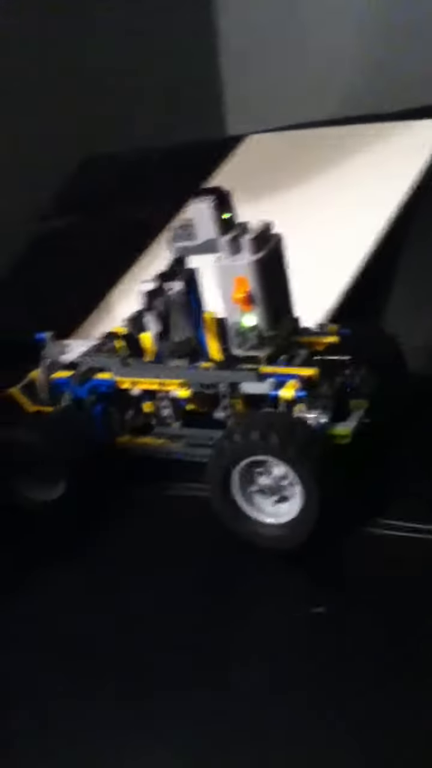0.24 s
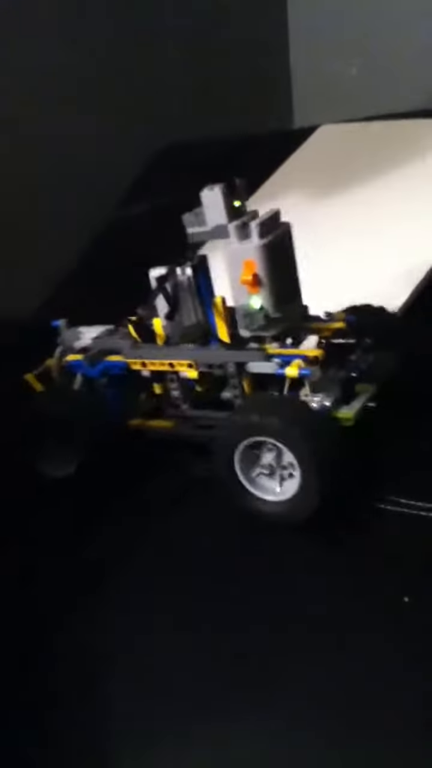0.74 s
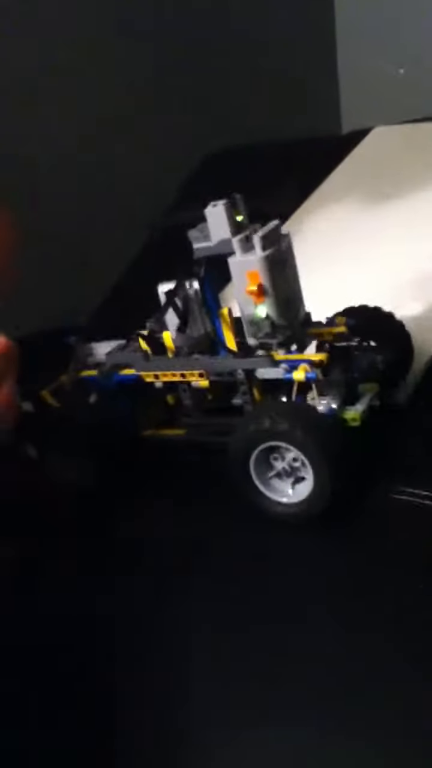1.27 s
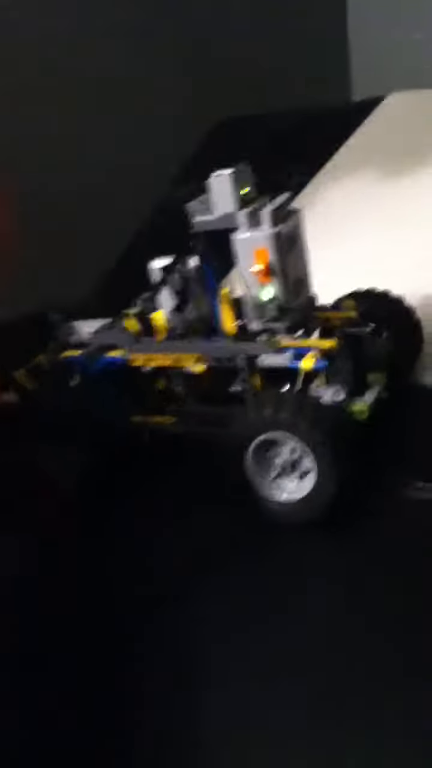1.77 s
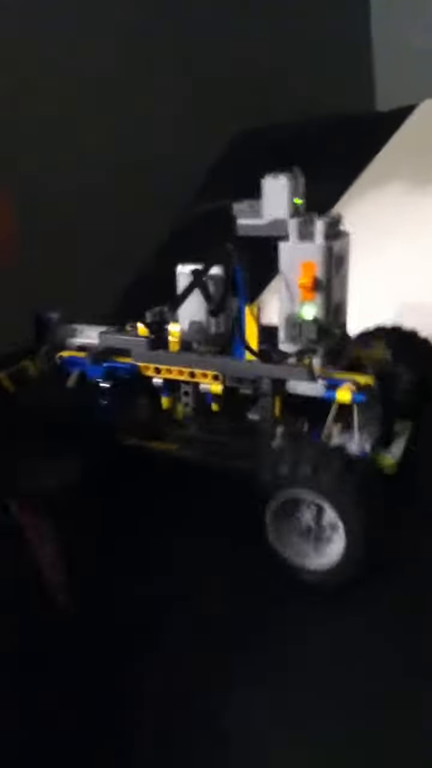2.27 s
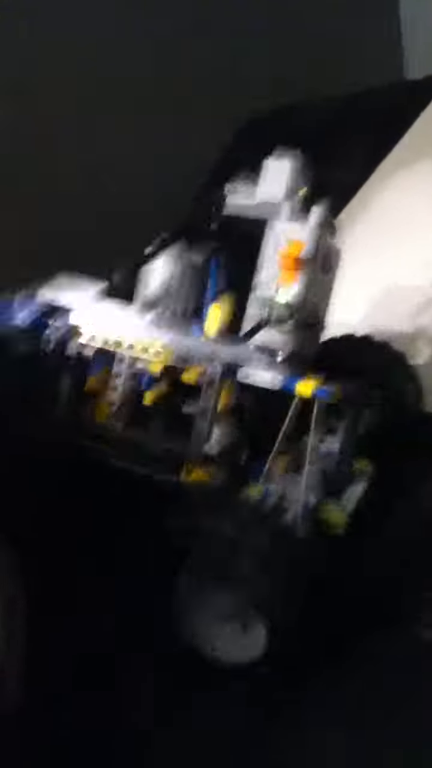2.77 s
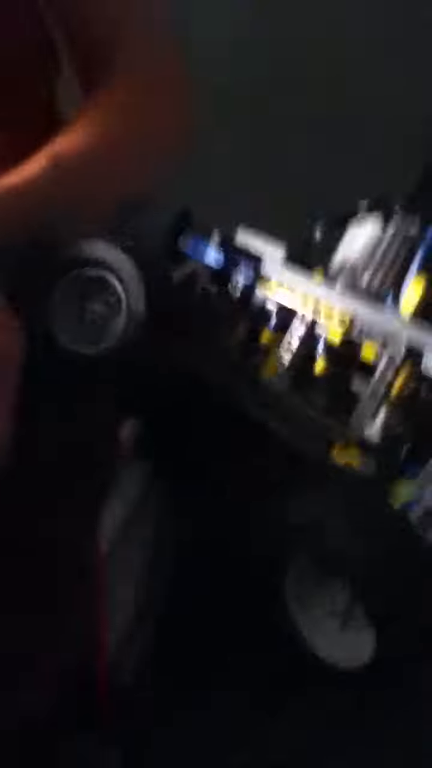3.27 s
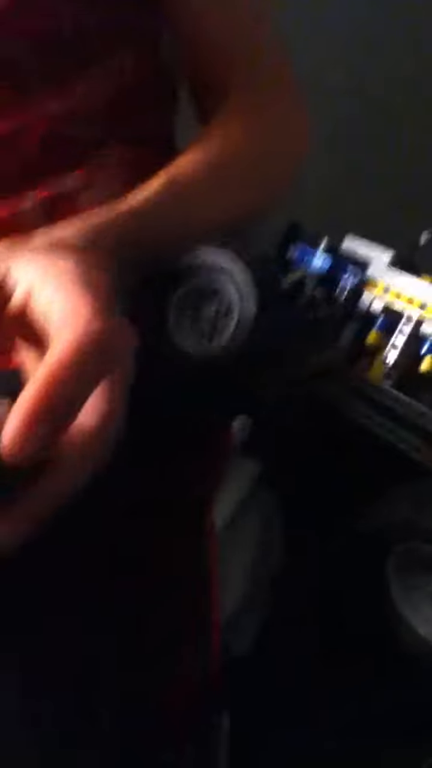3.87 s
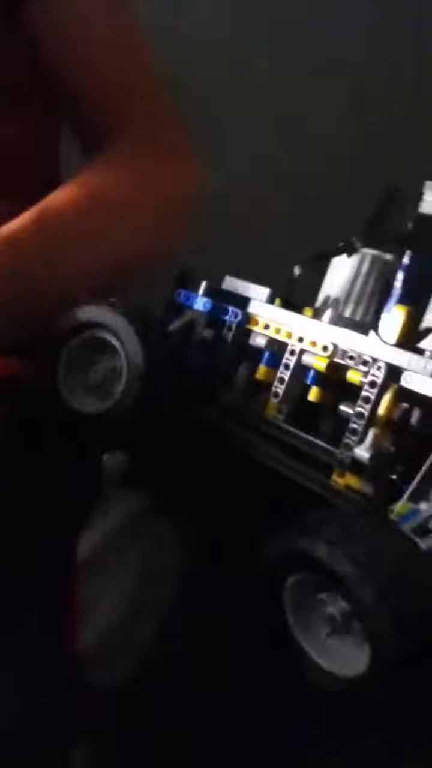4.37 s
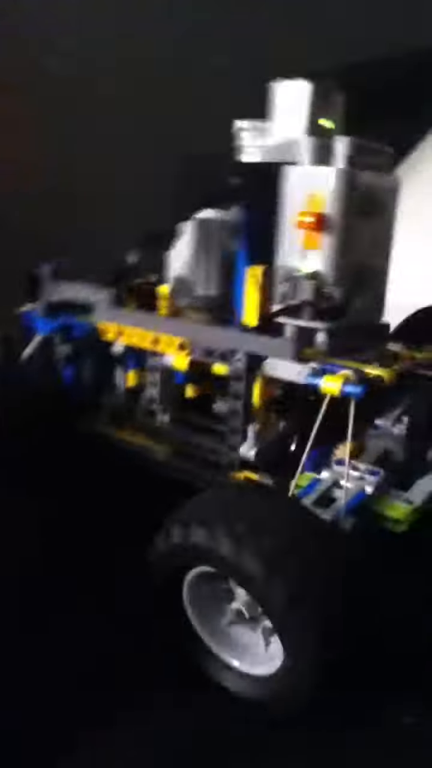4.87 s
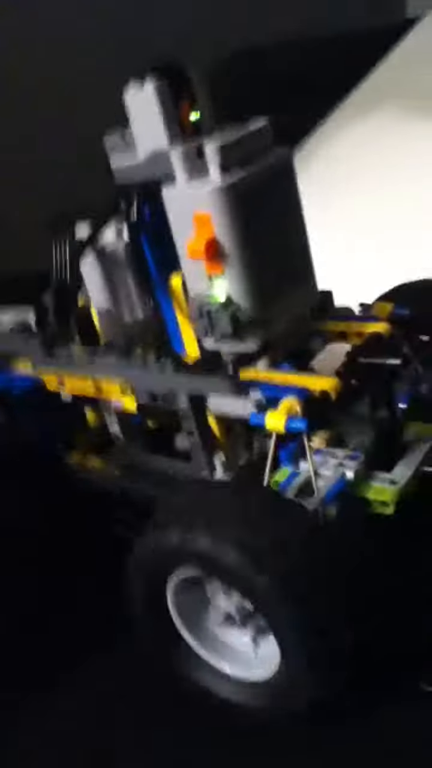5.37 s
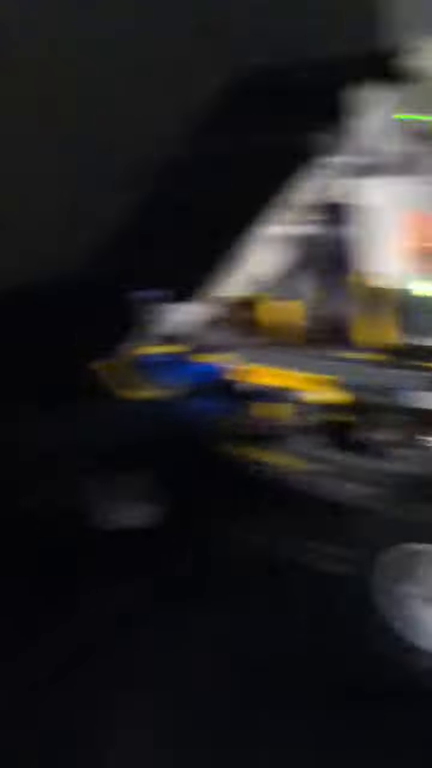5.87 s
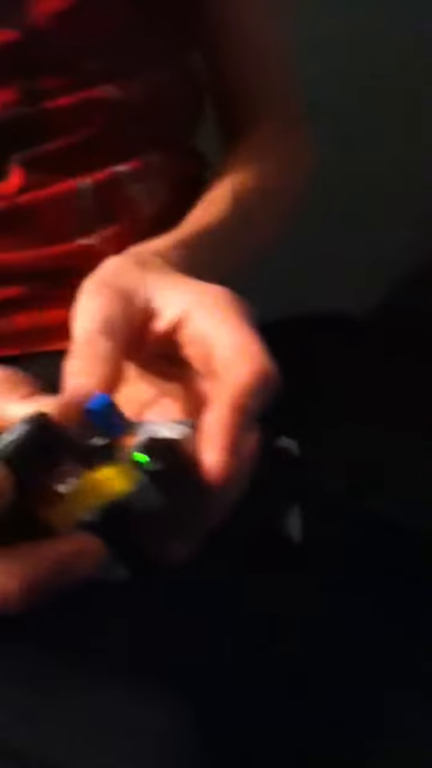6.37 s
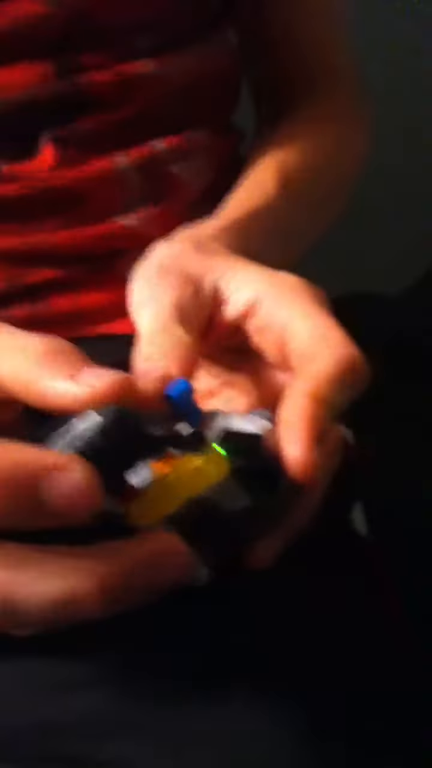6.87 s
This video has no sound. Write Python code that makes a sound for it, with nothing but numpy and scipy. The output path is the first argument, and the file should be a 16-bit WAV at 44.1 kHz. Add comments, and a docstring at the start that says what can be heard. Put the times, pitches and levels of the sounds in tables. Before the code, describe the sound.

A small electric motor whines and plastic gears grind in bursts as a brick-built toy truck starts, stops and coasts in a quiet room.

```python
"""In a quiet room a toy truck of plastic bricks is driven to and fro by a small geared motor.
The gear teeth whine at the rate they meet and grind noisily: wavering partials, and hiss with ticks.
Both ring through the panels of the housing, which face the microphone in turn as the truck is moved about.
Now and then a part snaps (a burst of contacts rings the bricks) or a wheel bumps (a click rings a low mode).
Behind this lie a short low rumble, the room's echo of the knocks, steady noise and a faint mains hum."""
import sys
import numpy as np
from scipy import signal
from scipy.fft import rfft, irfft
from scipy.io import wavfile
from scipy.ndimage import map_coordinates

SR = 44100
rng = np.random.default_rng(int(sys.argv[2]) if len(sys.argv) > 2 else 0)


def output_pcm(signal):
    """Save a mono or channel-first signal as 16-bit PCM at the path in sys.argv[1].

    Samples are clipped to [-1, 1] before scaling.
    """
    pcm = np.clip(np.atleast_2d(signal).T, -1, 1) * 32767
    wavfile.write(sys.argv[1], SR, np.round(pcm).astype(np.int16))


N = 313992  # length in samples


def from_db(db):
    """Turn decibels into a gain."""
    return 10 ** (np.asarray(db) / 20)


def rms_one(x):
    """Scale a sound to an rms (average strength) of 1."""
    return x / np.sqrt(np.mean(x ** 2) + 1e-20)


def in_time(rows):
    """Join the rows of a table into curves, one for each column after the time."""
    seconds, *columns = np.transpose(rows)
    return [np.interp(np.arange(N) / SR, seconds, column) for column in columns]


def colour(points):
    """Gain at each FFT frequency, joined up from points of Hz and dB."""
    hz, db = np.transpose(points)
    bins_hz = np.fft.rfftfreq(N, 1 / SR)
    return from_db(np.interp(np.log(bins_hz + 1), np.log(hz), db))


def drift(rate_hz):
    """A random wandering curve of rms 1: noise smoothed twice above rate_hz."""
    # made at a sixteenth of the sample rate; the first 4000 values let the filter settle
    r = np.exp(-32 * np.pi * rate_hz / SR)
    noise = rng.standard_normal(N // 16 + 4002)
    slow = signal.lfilter([1], [1, -2 * r, r * r], noise)[4000:]
    return np.interp(np.arange(N) / 16, np.arange(len(slow)), rms_one(slow))


def ring(clicks, hz, t60):
    """A struck mode: each unit click starts a sine of height 1 that falls 60 dB in t60 seconds."""
    r = from_db(-60 / (t60 * SR))
    w = 2 * np.pi * hz / SR
    return signal.lfilter([0, np.sin(w)], [1, -2 * r * np.cos(w), r * r], clicks + 1e-18)


# How fast the teeth of the fastest gear pair meet, as the load changes.
# Each row: time in seconds, tooth rate in Hz.
TOOTH_RATE = [(0, 1032), (.5, 1135), (.75, 1110), (.92, 923), (1.1, 951), (1.3, 1141), (1.37, 1107),
              (1.55, 940), (1.7, 880), (1.88, 624), (2.05, 762), (2.3, 812.5), (2.55, 845), (2.75, 968),
              (2.85, 991), (2.93, 950), (3.0, 935), (3.1, 910), (3.47, 713), (3.63, 819), (3.75, 949),
              (4.08, 958), (4.2, 1065), (4.3, 1080), (4.4, 1137), (4.55, 1055), (4.72, 997), (4.9, 992),
              (5.1, 1123), (5.22, 1159), (5.35, 1034), (5.8, 1025), (5.94, 1085), (6.18, 1023), (6.4, 1105),
              (6.58, 1098), (6.72, 993), (6.84, 1000), (6.88, 955), (6.94, 1130), (6.98, 1160),
              (7.04, 1080), (7.12, 1090)]
# The truck as the microphone sees it.
# Each row: time in seconds, heading in degrees, level in dB, extra level of the top panel in dB.
POSE = [(0, -77, -34.5, -9), (.3, -56, -34.5, -14), (.38, -86, -35, 7.5), (1.0, -59, -33, -3.5),
        (1.3, -43, -35.5, 7), (1.6, 19, -33, 1), (1.95, -3, -35, -2), (2.33, 37, -34, -1),
        (2.6, 73, -34.5, 1.5), (2.9, 110, -34, 6.5), (3.55, 92, -34.5, 4), (3.85, 151, -34, 3),
        (4.0, 173, -34.5, -12), (4.3, 210, -35.5, -3.5), (4.45, 182, -35.5, 5), (4.8, 205, -34.5, 3.5),
        (5.1, 248, -33, 2), (5.6, 265, -32, 2.5), (6.15, 232, -32, 2), (6.3, 197, -37.5, -13),
        (6.66, 23, -37.5, -1), (6.8, 209, -34, -39), (6.9, 203, -36, -1), (6.96, 178, -36, 9),
        (7.12, 160, -38, 6)]


def motor(surge_db=-0.17):
    """Whine and grind share one throttle and reach us through the housing and its near echoes."""
    mesh_hz = in_time(TOOTH_RATE)[0]
    heading, level_db, top_db = in_time(POSE)
    teeth = knocking(mesh_hz) * (whine(mesh_hz) + grind(mesh_hz))
    gears = near_echoes(housing(teeth, heading, top_db))
    return throttle() * from_db(level_db + surge_db * drift(4.2)) * gears


# Each run of the motor.
# Each row: switch-on in seconds, seconds to engage, dB below full at the start, switch-off in seconds,
# seconds to coast 20 dB down, time in seconds at which the gears halt.
RUNS = [(-.5, 0.0066, 5, 0.64, 0.5, .88), (.925, .012, 18, .94, .04, .946),
        (0.964, 0.018, 11.5, 1.57, 0.17, 1.65), (1.89, 0.0037, 13, 3.027, 0.83, 3.114),
        (3.475, 0.041, 16, 3.7, 0.44, 3.9), (3.964, 0.004, 6, 6.67, 8, 6.7),
        (6.735, .01, 9, 7.3, 1.5, 7.495)]
SPIN_UP_S, COAST_POWER = 0.056, 1.21  # time for the missing dB to shrink to 37 %; bend of the coasting
HALT_DB_PER_S = 202  # extra fall after the halt


def throttle():
    """Each run engages, spins up to full, and coasts down ever faster once released."""
    t = np.arange(N) / SR
    out = 0
    for on, engage, start_db, off, coast, halt in RUNS:
        spin_up_db = -start_db * np.exp(-np.maximum(t - on, 0) / SPIN_UP_S)
        coast_db = -20 * (np.maximum(t - off, 0) / coast) ** COAST_POWER
        halt_db = -HALT_DB_PER_S * np.maximum(t - halt, 0)
        engaged = np.clip((t - on) / max(engage, .002), 0, 1)
        out = out + engaged * from_db(spin_up_db + coast_db + halt_db)
    return out


# Spells in which one partial of the whine sings out.
# Each row: start in seconds, end in seconds, multiple of the tooth rate, added level in dB.
SPELLS = [(-.2, .45, 1 / 3, 16), (4.1, 4.42, 1 / 3, 14), (6.9, 7.3, 1 / 3, 11), (4.55, 4.92, .6, 11),
          (5.28, 6.2, .6, 12), (4.03, 4.27, .55, 12), (4.95, 5.15, .5, 10), (4.14, 4.36, 2 / 3, 7),
          (4.76, 4.92, 1.2, 9), (4.64, 5.0, 1.8, 10), (.6, .73, 1, 8), (1.08, 1.23, 1, 12),
          (1.29, 1.57, 1, 10), (4.5, 4.9, 1, 8), (2.65, 3.06, 1, 12), (4.1, 4.26, 1, 14),
          (4.95, 5.27, 1, 11), (5.33, 6.18, 1, 10), (-.2, .3, 1, 5), (6.3, 6.66, 1, 7), (6.9, 7.2, 1, 3),
          (1.09, 1.21, 2, 5), (1.35, 1.62, 2, 8), (2.65, 3.02, 2, 7), (4.5, 6.2, 2, 4), (6.34, 6.68, 2, 7),
          (-.2, .18, 2, 5), (6.75, 6.9, 2, 7), (7.0, 7.2, 2, 6), (1.33, 1.58, 3, 7), (2.28, 2.74, 3, 11),
          (2.76, 3.1, 3, 11), (6.33, 6.5, 3, 5), (3.55, 3.8, 3, 11), (4.66, 4.95, 3, 13),
          (5.33, 5.88, 3, 8), (6.94, 7.01, 3, 6), (7.04, 7.2, 3, 4), (1.38, 1.62, 4, 9.5),
          (1.08, 1.16, 4, 6), (1.93, 2.12, 4, 5), (2.12, 2.78, 4, 9), (3.58, 3.78, 4, 7),
          (4.62, 4.95, 4, 11), (6.56, 6.73, 4, 11), (-.2, .7, 4, 4), (.3, .78, 5, 11), (1.93, 2.7, 5, 10),
          (2.74, 3.05, 5, 6), (1.95, 2.1, 6, 9), (2.3, 2.68, 6, 10), (2.85, 3.08, 6, 6), (2.0, 2.5, 7, 8),
          (1.05, 1.45, 5, 7), (2.78, 3.06, 4, 9), (2.1, 2.3, 2, 5)]
FADE_S = .08  # length of the fades of a spell, and of the knocking


def spell_db(multiple):
    """Extra dB for one partial, faded in and out around the ends of its spells."""
    t = np.arange(N) / SR
    db = 0
    for start, end, which, added_db in SPELLS:
        if which == multiple:
            db = db + added_db * np.clip(np.minimum(t - start, end - t) / FADE_S + .5, 0, 1)
    return db


# Partials of the tooth rate; the fractional ones come from slower gear stages.
# Each row: multiple of the tooth rate, base level in dB at the normal rate,
# dB gained each time the speed doubles, steady part of the force (the random parts have size 1).
PARTIALS = [(1 / 3, -45, 0, .55), (.5, -42, 0, 1.5), (.55, -42, 0, 1.5), (.6, -42, 0, 2),
            (2 / 3, -42, 0, 1.5), (1, -36.5, 10, .9), (1.2, -39, 0, 1.2), (1.8, -32, 0, 1), (2, -23, 5, .3),
            (3, -23.5, 0, .6), (4, -19.5, 0, .5), (5, -21, 0, .6), (6, -23, 0, .4), (7, -26, 0, .4)]
NORMAL_HZ = 1000  # tooth rate at which speed adds no dB
SHAFT_TEETH = 8  # teeth that pass in one turn of the shaft


def whine(mesh_hz, wobble=.005, spread_hz=9, flicker_db=1.3, shaft_db=4.0):
    """Rough partials: the contact force varies from tooth to tooth, which blurs the high ones most."""
    # turns counts teeth: it grows by one each time a tooth meets
    turns = np.cumsum(mesh_hz * (1 + wobble * drift(29.5))) / SR
    out = 0
    for k, base_db, slope_db, steady in PARTIALS:
        db = base_db + slope_db * np.log2(mesh_hz / NORMAL_HZ) + spell_db(k)
        blur_hz = spread_hz * (1 + k ** 1.9)
        force = steady + drift(blur_hz) + 1j * drift(blur_hz)
        force = force * from_db(db + flicker_db * drift(9.8))
        out = out + np.real(force * np.exp(2j * np.pi * k * turns))
    return out * from_db(shaft_db * np.cos(2 * np.pi * turns / SHAFT_TEETH))


# Overall colour of the grinding noise.
# Each row: frequency in Hz, relative noise level in dB per Hz.
GRIND_COLOUR = [(200, -50), (320, -16), (600, -14.5), (1400, -12), (2000, -5), (3000, -4), (4500, -0.5),
                (7000, -3), (9500, -5), (11500, -4.5), (13000, -14.5), (15600, -25)]


def grind(mesh_hz, shaft_db=1.87, rattle_db=1.0, tick_share=0.18):
    """Sliding teeth hiss and tick, pulsing once a shaft turn."""
    turns = np.cumsum(mesh_hz * (1 + 0.0845 * drift(9.5))) / SR
    shaft = np.cos(2 * np.pi * turns / SHAFT_TEETH)
    happens = rng.random(N) < 1500 / SR  # about 1500 ticks a second
    strength = from_db(2.0 * np.minimum(rng.exponential(1, N), 4))
    ticks = happens * strength * rng.choice([-1, 1], N)
    force = rng.standard_normal(N) + tick_share * rms_one(ticks)
    force = force * from_db(shaft_db * shaft + rattle_db * drift(144))
    return rms_one(irfft(rfft(force) * colour(GRIND_COLOUR), N))


# A slower gear under load that knocks once a turn.
# One row: first knock in seconds, last knock in seconds, teeth a turn, swing in dB before chance.
KNOCKING = (2.3, 2.53, 22, 3.8)


def knocking(mesh_hz, sharp=4.2):
    """A gain that peaks once a turn of the loaded gear, by a chance amount."""
    first, last, teeth, swing_db = KNOCKING
    t = np.arange(N) / SR
    turns = np.cumsum(mesh_hz) / SR / teeth
    beat = np.cos(np.pi * (turns - turns[round(first * SR)])) ** 2
    present = np.clip(np.minimum(t - first, last - t) / FADE_S + 1, 0, 1)
    load = present * np.clip(1 + .3 * drift(12.0), 0, 1.5)
    return from_db(swing_db * load * (beat ** sharp - 0.16))


# Panels of the housing and how they ring; the last one is the top panel.
# Each row: frequency in Hz, width in Hz (9 dB down at its edges), base level in dB.
PANELS = [(840, 2260, -6), (1850, 2480, -7.5), (2500, 600, -17.5), (3320, 960, -8.5), (3934, 1120, -9.5),
          (4500, 380, -15), (5446, 960, -1.5), (6920, 1200, -6), (8440, 510, -11), (10440, 590, -15.5),
          (9190, 1770, -4)]
# How each of these panels radiates, in the same order.
# Each row: heading at which it is loudest in degrees, swing in dB, mean in dB.
PANEL_AIM = [(280, 2.5, -1.5), (203, 8, -1.5), (130, 18.5, -5.5), (123, 8, -1), (-16, 10.5, -0.5),
             (-43, 8, -5), (-20, 2.5, -3), (177, 4.5, -4), (8, 7, -3), (244, 6.5, -7.5), (227, 2.5, 0)]


def housing(direct, heading, top_db, patchy_db=2.0, direct_db=-7):
    """The gears ring in the panels of the housing; a panel is loudest when it faces the microphone."""
    hz, spectrum = np.fft.rfftfreq(N, 1 / SR), rfft(direct)
    facing = [mean_db + swing_db * np.cos(np.radians(heading - aim))
              for aim, swing_db, mean_db in PANEL_AIM]
    facing[-1] = facing[-1] + top_db
    out = from_db(direct_db) * direct
    for (centre, width, db), facing_db in zip(PANELS, facing):
        resonance = 1 / (1 + (2 * (hz - centre) / width) ** 2) ** 1.5
        panel = irfft(spectrum * resonance, N)
        out = out + from_db(db + facing_db + patchy_db * drift(5.2)) * panel
    return out


# Surfaces near the truck; their delays wander as truck and microphone move.
# Each row: mean echo delay in ms, level in dB.
NEAR_SURFACES = [(1.3, -17), (2.3, -15), (3.7, -15), (5.3, -15)]
WANDER_MS, WANDER_HZ = .12, .5  # rms size and rate of the wander
SOFT_BELOW_HZ = 2200  # echoes are weak below this


def near_echoes(x):
    """Early echoes of the treble comb the sound into narrow bands that slide about."""
    out, n = x, np.arange(N)
    bright = signal.sosfilt(signal.butter(2, SOFT_BELOW_HZ, "high", fs=SR, output="sos"), x)
    for ms, db in NEAR_SURFACES:
        delay = (ms + WANDER_MS * drift(WANDER_HZ)) * SR / 1000  # in samples
        echo = map_coordinates(bright, [n - delay], order=2, mode="mirror")
        out = out + from_db(db) * echo
    return out


# Plastic snaps.
# Each row: start in seconds, peak in dB before the band filter, frequency struck best in Hz,
# breadth in octaves (a mode that far off is struck 12 dB weaker), time of the contacts to die to 37 % in ms.
SNAPS = [(2.7716, -16, 3300, 1.1, 1.2), (2.949, -12, 3700, 0.87, 2.7), (3.3662, -25.5, 5400, 1.5, 1.1),
         (3.488, -40, 4970, .6, 1.3), (3.6555, -12.5, 3954, .8, 0.68), (3.658, -11, 4500, 0.8, 1.7),
         (3.818, -26, 6500, 0.82, 0.8), (3.968, -32, 3470, 0.97, 1.6), (4.5915, -21, 3400, .7, .8),
         (4.598, -25, 1900, .6, 1.5), (6.254, -30, 2800, .5, 2), (6.0766, -4, 3400, 1.3, 2.2),
         (6.518, -22, 4200, 1.1, 1.6), (6.5235, -21, 5790, 0.6, 1.2), (6.574, -33, 2600, 0.41, 1.3)]
# Modes in which a brick rings.
# Each row: frequency in Hz, strength in dB before chance and place of strike, time to fall 60 dB in seconds.
BRICK_MODES = [(1440, -37, 0.0047), (1990, -9, 0.02), (2280, -5.5, 0.0087), (2740, -7, .007),
               (3270, -10.5, 0.0031), (3800, 1, 0.01), (4250, 9, 0.0094), (5420, -3.5, 0.0055),
               (5780, 1, 0.005), (6500, 3, 0.0073), (7400, 3, .006), (7800, -23, 0.007)]


def snaps():
    """A snap is a short dying burst of contacts that strikes the brick modes, each time differently."""
    size = 2600  # samples kept of each snap
    out = np.zeros(N)
    for s, db, best_hz, breadth, ms in SNAPS:
        fade = np.exp(-np.arange(size) / (max(ms, .2) * SR / 1000))
        chatter = rng.standard_normal(size) * fade
        chatter[0] = 1.96  # a firm first contact
        sound = 0
        for hz, level, t60 in BRICK_MODES:
            off_best = np.log2(hz / best_hz) / max(breadth, .2)
            struck_db = level + rng.normal(0, 1.5) - 12 * off_best ** 2
            sound = sound + from_db(struck_db) * ring(chatter, hz, t60)
        i = round(s * SR)
        out[i:i + size] += from_db(db) * sound / abs(sound).max()
    # small soft parts radiate no bass and little top
    return signal.sosfilt(signal.butter(4, [1100, 9500], "band", fs=SR, output="sos"), out)


# Dull bumps of wheels and hands.
# Each row: start in seconds, strike level in dB, frequency in Hz, time to fall 60 dB in seconds,
# strength of the slap against the mode.
BUMPS = [(2.777, -38, 631, .027, .5), (3.2692, -34, 270, .025, 1.2), (4.345, -42, 600, .02, .5),
         (4.521, -36, 636, .025, .6), (4.597, -35, 630, .03, .4), (5.1625, -32, 696, .012, 1.6),
         (5.423, -39, 300, .012, 1.1)]


def bumps():
    """Soft low knocks, each a damped mode with a short slap at 1000 Hz on top."""
    out = np.zeros(N)
    for s, db, hz, t60, slap in BUMPS:
        click = np.zeros(4000)
        click[:10] = -np.hanning(10) / 5
        mode = ring(click, hz, max(t60, .005))
        sound = mode + slap * ring(click, 1000, 0.0068)
        out[round(s * SR):][:4000] += from_db(db) * sound
    # light parts move little air
    return signal.sosfilt(signal.butter(2, 150, "high", fs=SR, output="sos"), out)


# A short low rumble.
# Each row: time in seconds, level in dB.
RUMBLE = [(.5, -93), (.54, -53), (.64, -51), (.68, -93)]


def rumble():
    """Low noise between about 110 and 280 Hz that swells briefly."""
    band = signal.butter(2, [110, 280], "band", fs=SR, output="sos")
    low = signal.sosfilt(band, rng.standard_normal(N))
    return from_db(in_time(RUMBLE)[0]) * rms_one(low)


ROOM_T60_S, ROOM_WET_DB = 0.23, -24  # time for the echo to fall 60 dB; its level


def room(x):
    """A decaying noise tail stands for the many reflections of a small room."""
    t = np.arange(int(.4 * SR)) / SR
    tail = rng.standard_normal(len(t)) * from_db(-60 * t / ROOM_T60_S) * (t > .004)
    return signal.fftconvolve(x, tail / np.sqrt(np.sum(tail ** 2)))[:N]


# Colour of the steady background noise.
# Each row: frequency in Hz, relative noise level in dB per Hz.
AIR_COLOUR = [(21, -45), (38, -16), (125, -3.5), (200, -5), (323, -7), (450, -11.5), (712, -16), (896, -14),
              (1380, -20), (2900, -19), (4150, -13.5), (4950, -20.5), (11500, -27), (13400, -33),
              (15600, -30)]
AIR_DB = -53.2  # rms level
HUM_HZ, HUM_DB = 119.6, -68.5  # pitch and middle level


def room_tone():
    """Steady air and microphone noise with a faint, slightly wavering mains hum."""
    air = rms_one(irfft(rfft(rng.standard_normal(N)) * colour(AIR_COLOUR), N))
    hum_gain = from_db(HUM_DB + 0.91 * drift(6.5))
    hum = np.sin(2 * np.pi * HUM_HZ * np.arange(N) / SR) * hum_gain
    return from_db(AIR_DB) * air + hum


def scene():
    """Motor, knocks and rumble, and the room's echo of these last two, over the room tone."""
    knocks = snaps() + bumps() + rumble()
    echo = from_db(ROOM_WET_DB) * room(knocks)
    return (motor() + knocks + echo + room_tone())[None]


CUTOFF_HZ = 15850  # from here up the sound is 60 dB down


def record(dry):
    """A steep low-pass filter cuts the top."""
    return signal.sosfilt(signal.cheby2(20, 60, CUTOFF_HZ, fs=SR, output="sos"), dry)


dry = scene()
out = record(dry)
output_pcm(out)
```